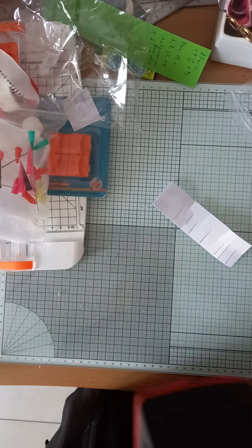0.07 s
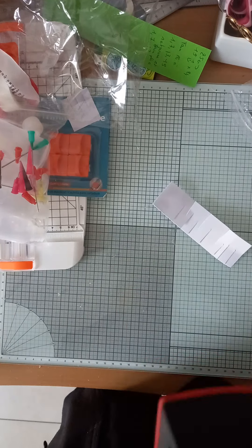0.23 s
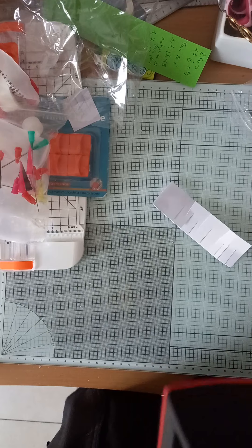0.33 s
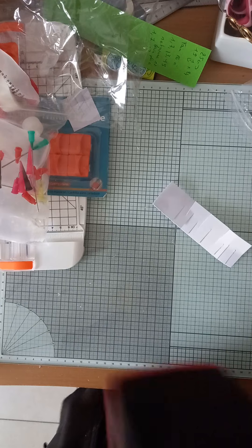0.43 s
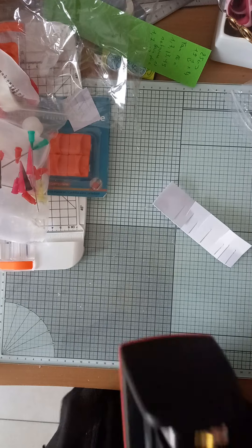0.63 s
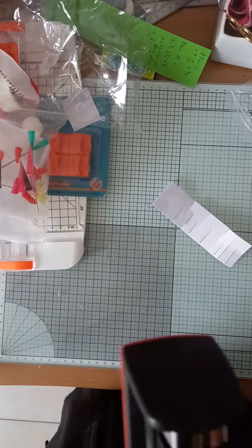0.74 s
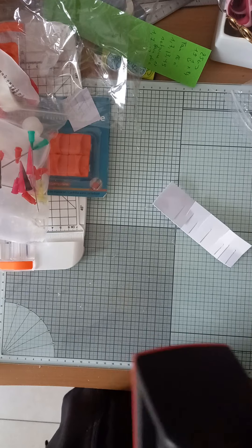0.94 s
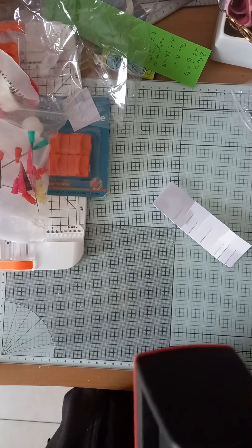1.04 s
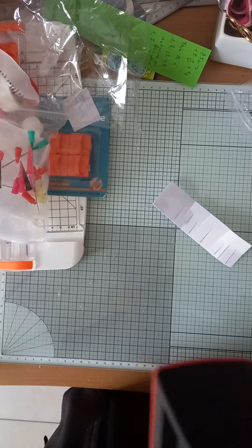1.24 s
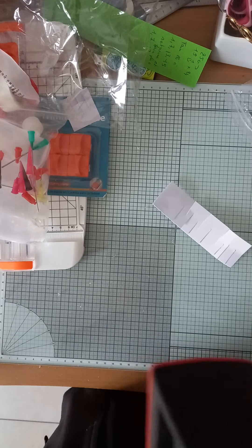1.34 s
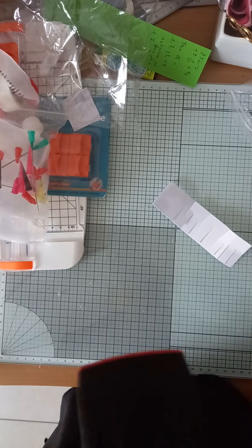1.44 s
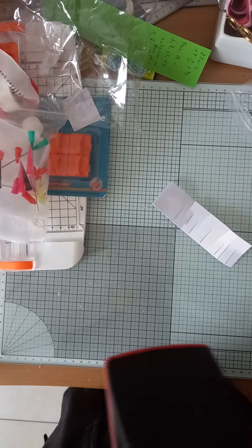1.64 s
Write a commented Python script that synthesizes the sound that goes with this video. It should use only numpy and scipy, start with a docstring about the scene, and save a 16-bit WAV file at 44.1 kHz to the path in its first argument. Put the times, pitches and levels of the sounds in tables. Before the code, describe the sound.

A scissor blade rasps twice through a small handheld sharpener, with plastic clicks.

```python
"""Scissor blade through a hand sharpener

A blade is pulled twice through a small plastic sharpener, close up in a small room. The edge tears over
the abrasive in dense tiny catches that hiss and ring the steel. Blade and housing click and scuff as
the blade is set in the slot and slips out. The room rings briefly over a low rumble and hum."""
import sys
import numpy as np
from scipy import signal
from scipy.fft import rfft, irfft
from scipy.io import wavfile

SR = 44100
rng = np.random.default_rng(int(sys.argv[2]) if len(sys.argv) > 2 else 0)


def dump(signal):
    """Clip the signal to [-1, 1] and save it as 16-bit WAV at the path in sys.argv[1]."""
    limited = np.clip(np.atleast_2d(signal).T, -1, 1)
    pcm = np.round(limited * 32767).astype(np.int16)
    wavfile.write(sys.argv[1], SR, pcm)


N = 74970

# Tone of the room's rumble and of the microphone hiss. Each row: frequency in Hz, gain in dB.
RUMBLE_EQ = [(20, -74), (38, -40), (62, -8.5), (120, -3), (165, -10), (290, -9), (500, -16.5), (900, -22.5),
             (2000, -32), (4000, -41), (9000, -53), (16000, -117)]
MIC_HISS_EQ = [(1000, 8), (6000, -4.5), (9500, -7.5), (12500, 2), (16000, -1)]
# Hum tones. Each row: frequency in Hz, level in dB before the swell.
HUM_TONES = [(127, -54), (399, -62)]
# Swell of the bass and hum. Each row: time in seconds, gain in dB.
LOW_SWELL = [(0, 3.5), (.12, 2), (.3, 3), (.67, -2), (.78, 4), (.9, -3), (1.2, 6.5), (1.3, 0), (1.7, -9.5)]
# Blade meeting sharpener. Each row: start in seconds, relative levels in dB of housing knock,
# steel tick, blade ring and low thud, then knock centre in Hz, steel snap in Hz.
CONTACTS = [(0.2147, -25, -8, -15, 0.5, 2040, 8400), (0.2202, -1.5, 4.5, 1, 5, 1820, 7560),
            (0.2224, 1.5, -8, -8, 2, 1780, 6500), (0.4163, 2, 1.5, -6, -26, 1700, 4940),
            (0.4632, -20, 3, -17, 5, 1800, 4420), (0.4721, 5.5, -13, -29, 10.5, 1090, 4450),
            (1.0114, 7, -13.5, -40, -17, 1150, 4570), (1.036, 10, 0, -29, -15, 1670, 4270),
            (1.0376, 10, -9, -12, -12, 1050, 12900), (1.041, 4, -11, -29, -18, 1500, 7500),
            (1.0878, 10, 6.5, -6, 11.5, 1130, 6250), (1.0899, 0.5, -0.5, -24, -19, 1430, 8900),
            (1.0932, -12, -4.5, -20, -15, 1420, 11800), (1.4271, 1, 0, 0.5, 4.5, 1200, 6640),
            (1.443, -4, -0.5, -30, 8.5, 1390, 4800), (1.6713, 7, -9.5, -11, -27, 714, 13200)]
# Tone of the steel tick and of the thud in the hand. Each row: frequency in Hz, gain in dB.
TICK_EQ = [(300, -9), (1500, -4.5), (2600, 0.5), (3700, -4.5), (4600, -2.5), (7000, -3.5), (10000, -1.5),
           (12500, -3), (16000, -1.5)]
THUD_EQ = [(35, -60), (70, -30), (130, -8), (240, 4.5), (500, 1.5), (1000, -20), (4000, -48)]
# Modes of the plastic body. Each row: frequency in Hz, t60 in seconds, gain in dB.
HOUSING_MODES = [(292, 0.055, -0.5), (404, 0.11, 6), (522, 0.028, -3), (814, 0.015, -5), (1103, 0.011, 1.5),
                 (1358, 0.0096, -0.5), (1658, 0.012, 5), (2070, 0.0038, 2), (3150, 0.0033, -3)]
# Modes of the steel. Each row: frequency in Hz, t60 in seconds, gains in dB for pull one, pull two, click.
BLADE_MODES = [(1954, 0.082, 13.5, 6, -3), (4300, 0.0086, -3.5, -0.5, 3.5), (5200, .007, -2, -24, -29),
               (6645, 0.08, 13, -0.5, 3), (7360, 0.038, 11, -14, 2), (7634, .06, 18.5, -19, 1),
               (7700, .04, 17, -8, -6), (8350, 0.01, 13.5, -6, -4), (8510, 0.033, 15.5, -11, 6),
               (11970, 0.0076, -8, 10.5, -5), (12900, 0.0045, -8, 5, -18)]
# Light touches on the plastic. Each row: start in seconds, length in seconds, level in dB.
SCUFF_TOUCHES = [(0.233, 0.026, -38), (1.014, 0.07, -41), (1.261, 0.008, -43), (1.283, 0.016, -43)]
# Tone of those touches. Each row: frequency in Hz, gain in dB.
SCUFF_EQ = [(1000, -5), (2000, -2), (4000, -9), (7000, -13.5), (10000, -13), (12500, -8), (15000, -13)]
# Pressure through each pull. Each row: time in seconds, relative level in dB.
FIRST_PRESSURE = [(.366, -36), (.372, -35.5), (.395, -25.5), (.413, -21.5), (.421, -18), (.425, -24),
                  (.429, -21.5), (.44, -23.5), (.464, -23), (.47, -66)]
SECOND_PRESSURE = [(1.311, -43), (1.316, -39), (1.345, -29.5), (1.366, -22.5), (1.381, -26), (1.394, -25.5),
                   (1.408, -22.5), (1.424, -32), (1.434, -26), (1.45, -58)]
# Hiss of the edge on the abrasive in each pull. Each row: frequency in Hz, gain in dB.
FIRST_EDGE_EQ = [(1000, -24.5), (2600, 2.5), (3700, -2.5), (5000, 1.5), (6000, -3), (7900, 5),
                 (10200, -4.5), (12500, 3), (16000, 0)]
SECOND_EDGE_EQ = [(1000, -17), (2000, 0), (3500, -8.5), (4400, -1.5), (6800, -11.5), (8800, 3), (10500, 3),
                  (12500, 1.5), (15000, 3)]
# Tone the second pull throws sideways into the room. Each row: frequency in Hz, gain in dB.
SIDEWAYS_EQ = [(4500, -1), (6500, 10), (9000, -2.5), (12000, -2), (14500, -5.5)]
# Shading at the left microphone. Each row: frequency in Hz, gain in dB.
LEFT_SHADE_EQ = [(200, -5), (1500, -1), (4500, -5.5), (8000, -2.5), (11000, -5.5), (16000, -4)]
# The room's reverb. Each row: frequency in Hz, t60 in seconds, relative level in dB.
ROOM_BANDS = [(149, 0.29, -4), (500, 0.51, -2.5), (1910, 0.5, -6.5), (4470, 0.43, -7), (6800, 0.41, -6),
              (8900, 0.31, -8.5), (15140, 0.39, -11.5)]

KNOCK_T60_S = 0.0036  # a knock is a short, springy push
CHATTER_S, CHATTER_DB = 0.00052, 6  # the contact buzzes briefly after each click
SNAP_T60_S, SNAP_DB = 0.004, 6.5  # short ring of the steel next to the contact
CATCHES_PER_S, CATCH_SPREAD_DB, JUDDER_HZ, JUDDER_DB = 5000, 2.5, 295.4, 4.5
HOUSING_FOLLOW = 0.34  # dB of housing rasp per dB of pressure
RING_FOLLOW = 0.33  # extra dB of ring per dB of pressure: the blade sings only when the edge bites
LEAVE_S, RING_FADE_DB_PER_S = 0.029, 200  # the ring fades as the tip leaves the slot
WANDER_PER_S = 81  # how fast the sliding contact detunes the steel
TABLE_LAG_S, TABLE_DECAY_S = 0.0012, 0.0044  # scatter off the tabletop
ROOM_BUILD_S, ROOM_LEFT_DB, LEFT_LAG_SAMPLES = 0.0041, 1.5, 7
TIME = np.arange(N) / SR


def amp(db):
    """Decibels to gain."""
    return 10 ** (np.asarray(db) / 20)


def unit(x):
    """Scale to rms 1."""
    return x / np.sqrt(np.mean(x ** 2))


def over_hz(f, hz, values):
    """Read a curve on a log-frequency axis."""
    return np.interp(np.log(np.maximum(f, 1)), np.log(hz), values)


def eq(x, points):
    """Minimum-phase EQ through (Hz, dB) points."""
    size = 4096
    gain = amp(over_hz(np.fft.rfftfreq(size, 1 / SR), *np.array(points).T))
    cepstrum = irfft(np.log(gain))
    cepstrum[1:size // 2] *= 2
    cepstrum[size // 2 + 1:] = 0
    return signal.fftconvolve(x, irfft(np.exp(rfft(cepstrum))))[:N]


def low_cut(x, hz):
    """Second-order high-pass."""
    return signal.sosfilt(signal.butter(2, hz, "high", fs=SR, output="sos"), x)


def ring(x, hz, t60):
    """One decaying mode, gain 1 at its centre; the centre may move."""
    pole = np.exp(-np.log(1000) / (t60 * SR))
    turn = np.exp(2j * np.pi * np.cumsum(hz * np.ones(N)) / SR)
    return 2 * (1 - pole) * (turn * signal.lfilter([1], [1, -pole], x / turn)).real


def drift(per_s):
    """Smooth random wander with a spread near 1."""
    return np.interp(TIME * per_s, np.arange(N // 10), rng.standard_normal(N // 10))


def burst(decay_s):
    """A dying spray of reflections with unit energy and an even spectrum."""
    fade = np.exp(-TIME[:N // 20] / decay_s)
    spray = rng.standard_normal(len(fade)) * fade
    for _ in range(10):
        flattened = irfft(np.exp(1j * np.angle(rfft(spray))), len(spray))
        spray = flattened * np.minimum(1, 10 * fade)
    return spray / np.linalg.norm(spray)


def room_tone():
    """The stereo bed: swelling low rumble, a wavering hum and faint microphone hiss."""
    common = amp(-6.5) * rng.standard_normal(N)
    rumble = np.array([unit(eq(common + rng.standard_normal(N), RUMBLE_EQ)) for _ in range(2)])
    hum = sum(amp(db + drift(16.7)) * np.sin(2 * np.pi * hz * TIME + 0.5 * drift(21))
              for hz, db in HUM_TONES)
    bass = signal.sosfiltfilt(signal.butter(2, 200, fs=SR, output="sos"), rumble)
    hiss = np.array([unit(eq(rng.standard_normal(N), MIC_HISS_EQ)) for _ in range(2)])
    swell = amp(np.interp(TIME, *np.array(LOW_SWELL).T))
    return amp(-45.5) * (rumble + (swell - 1) * bass) + swell * hum + amp(-57) * hiss


def clicks():
    """Each contact knocks the housing, ticks, rings the steel and thuds in the hand."""
    knocks, ticks, rings, thuds = np.zeros((4, N))
    for start_s, knock_db, tick_db, ring_db, thud_db, knock_hz, snap_hz in CONTACTS:
        blow = np.zeros(N)
        blow[int(start_s * SR)] = 1
        chatter = amp(CHATTER_DB) * signal.fftconvolve(blow, burst(CHATTER_S))[:N]
        buzz = (blow + chatter) / np.hypot(1, amp(CHATTER_DB))
        knocks += amp(knock_db) * ring(blow, knock_hz, KNOCK_T60_S)
        ticks += amp(tick_db) * (buzz + amp(SNAP_DB) * ring(buzz, snap_hz, SNAP_T60_S))
        rings += amp(ring_db) * blow
        thuds += amp(thud_db) * blow
    body = amp(3.5) * housing(knocks) + amp(-2) * eq(thuds, THUD_EQ)
    steel = amp(-1) * eq(ticks, TICK_EQ) + amp(4.5) * blade(rings, contact="click")
    return low_cut(body + steel, hz=198)


def housing(drive):
    """The plastic body rings briefly, its modes alternating in polarity."""
    return sum((-1) ** k * amp(db) * ring(drive, hz, t60)
               for k, (hz, t60, db) in enumerate(HOUSING_MODES))


def blade(drive, contact, bend=1):
    """The steel rings: the place of contact sets each mode's strength, and bend scales its pitch."""
    column = ("first", "second", "click").index(contact)
    return sum(amp(gains_db[column]) * ring(drive, hz * bend, t60) for hz, t60, *gains_db in BLADE_MODES)


def scuffs():
    """The blade brushes the plastic faintly as it finds the slot."""
    level = np.zeros(N)
    for start_s, length_s, db in SCUFF_TOUCHES:
        from_middle = 2 * (TIME - start_s) / length_s - 1
        level += amp(db) * np.sqrt(np.maximum(0, 1 - from_middle ** 2))
    return level * unit(eq(catches(), SCUFF_EQ))


def catches():
    """The grain of the friction: dense tiny catches of the edge, juddering with stick and slip."""
    hits = rng.random(N) < CATCHES_PER_S / SR
    polarity = rng.choice([-1, 1], N)
    strength_db = CATCH_SPREAD_DB * rng.standard_normal(N) + JUDDER_DB * drift(JUDDER_HZ)
    return unit(hits * polarity * amp(strength_db))


def pull(pressure, edge_eq, contact, steel_db, housing_db, detune):
    """Catches hiss and ring the blade, whose pitch wanders as the contact slides; the housing rasps."""
    pressure_db = np.interp(TIME, *np.array(pressure).T, left=-200, right=-200)
    bite_db = RING_FOLLOW * (pressure_db - pressure_db.max())
    leaving_s = np.maximum(0, TIME - pressure[-1][0] + LEAVE_S)
    ring_db = pressure_db + bite_db - RING_FADE_DB_PER_S * leaving_s
    hiss = eq(catches() * amp(pressure_db), edge_eq)
    singing = blade(catches() * amp(ring_db), contact, bend=1 + detune * drift(WANDER_PER_S))
    rasp = housing(catches() * amp(HOUSING_FOLLOW * pressure_db))
    return amp(steel_db) * (hiss + singing) + amp(housing_db) * rasp


def table_scatter(x):
    """A tight spray of reflections off the tabletop."""
    response = np.pad(burst(TABLE_DECAY_S), (int(TABLE_LAG_S * SR), 0))
    return signal.fftconvolve(x, response)[:N]


def room_tail(x):
    """Diffuse reverb at one microphone; the mids hang on longest."""
    freqs, centres_hz = np.fft.rfftfreq(N, 1 / SR), np.array(ROOM_BANDS)[:, 0]
    spectrum, tail = rfft(rng.standard_normal(N)), np.zeros(N)
    for share, (_, t60, db) in zip(np.eye(len(ROOM_BANDS)), ROOM_BANDS):
        band = irfft(spectrum * over_hz(freqs, centres_hz, share), N)
        rate = np.log(1000) / t60
        tail += amp(db) * band * np.exp(-rate * TIME) * np.sqrt(2 * rate / SR)
    build_up = 1 - np.exp(-TIME / ROOM_BUILD_S)
    return signal.fftconvolve(x, tail * build_up)[:N]


def place_right(source, send, scatter_db, room_db, left_db):
    """The sharpener is held to the right: the left side is late and shaded; table and room answer."""
    left, right = [source + amp(scatter_db) * table_scatter(source) for _ in range(2)]
    left = amp(left_db) * eq(np.pad(left, (LEFT_LAG_SAMPLES, 0))[:N], LEFT_SHADE_EQ)
    left_tail, right_tail = [amp(room_db) * room_tail(send) for _ in range(2)]
    return np.array([left + amp(ROOM_LEFT_DB) * left_tail, right + right_tail])


def scene():
    """Two pulls and the handling around them, over room tone."""
    first = pull(FIRST_PRESSURE, FIRST_EDGE_EQ, "first", steel_db=-1, housing_db=-18.5, detune=0.0025)
    second = pull(SECOND_PRESSURE, SECOND_EDGE_EQ, "second", steel_db=1, housing_db=-14, detune=0.013)
    handling = clicks() + scuffs()
    return (place_right(first, send=first, scatter_db=0, room_db=2, left_db=-1.5)
            + place_right(second, send=eq(second, SIDEWAYS_EQ), scatter_db=-4, room_db=4, left_db=-4)
            + place_right(handling, send=handling, scatter_db=-2, room_db=-3.5, left_db=-2)
            + room_tone())


def record(dry):
    """The phone cuts the deepest bass and the very top."""
    high_cut = signal.ellip(10, 0.2, 70, 15850, fs=SR, output="sos")
    return signal.sosfilt(high_cut, low_cut(dry, hz=40))


dry = scene()
out = record(dry)
dump(out)
```